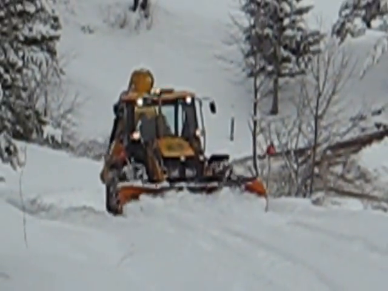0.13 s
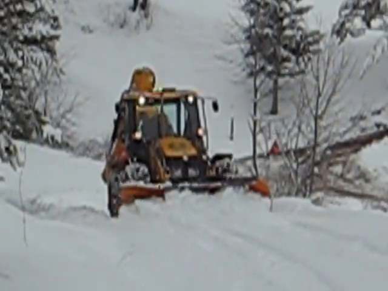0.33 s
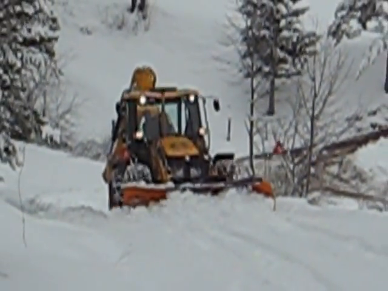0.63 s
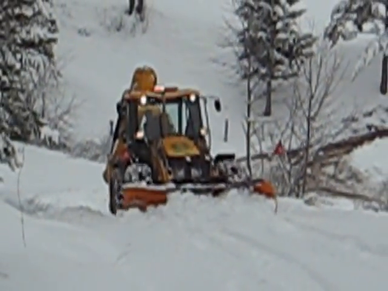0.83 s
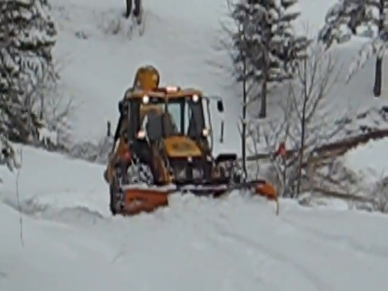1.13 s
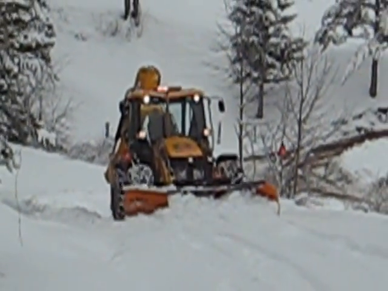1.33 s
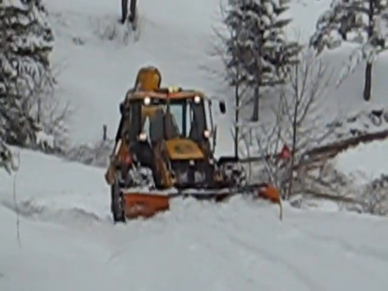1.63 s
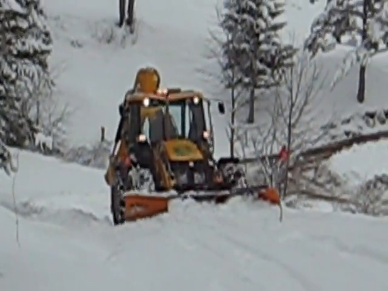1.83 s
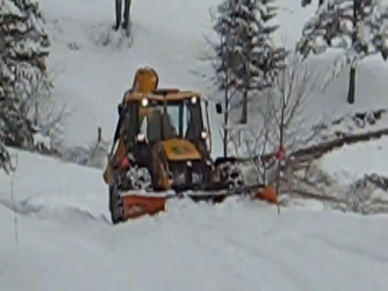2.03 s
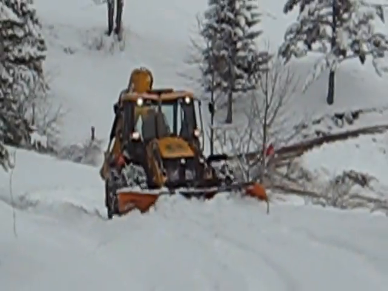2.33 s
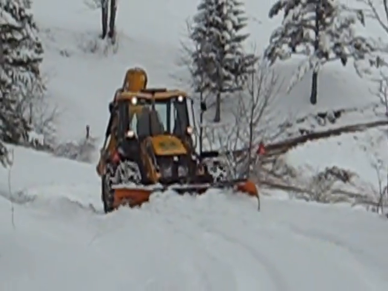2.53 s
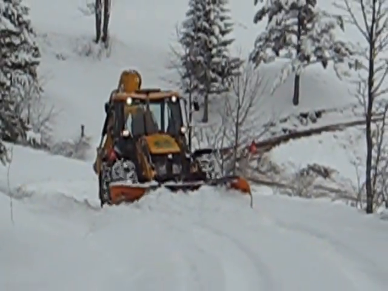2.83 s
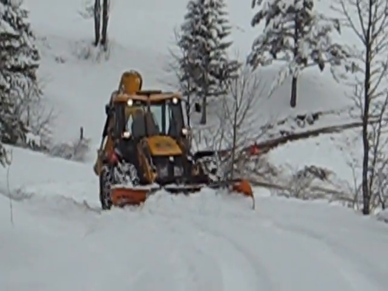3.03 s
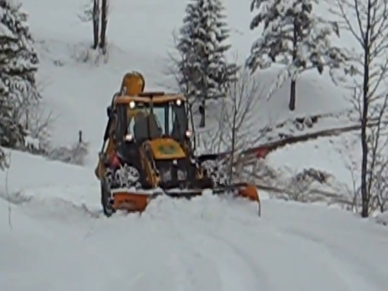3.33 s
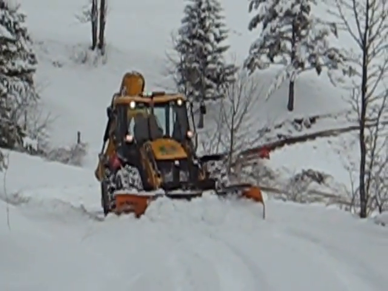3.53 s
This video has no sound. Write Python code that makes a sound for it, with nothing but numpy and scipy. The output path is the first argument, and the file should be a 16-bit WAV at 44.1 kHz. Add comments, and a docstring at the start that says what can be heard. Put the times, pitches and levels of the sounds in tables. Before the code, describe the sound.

A backhoe loader's diesel engine runs at high revs as it pushes snow toward the microphone outdoors. The exhaust drones over knocking clatter, fan rush and a faint whine, with a few brief dips in level.

```python
"""Four-cylinder diesel of a backhoe loader at high revs, pushing snow towards the listener. The exhaust drones
on the firing rate and barks once per cylinder; the block knocks, the fan rushes. A faint turbo whistle sinks
slowly. Bands of colour slide, mostly down, as the machine moves, and the level dips abruptly a few times."""
import sys
import numpy as np
from scipy import signal
from scipy.fft import rfft, irfft
from scipy.io import wavfile
from scipy.ndimage import map_coordinates

SR = 44100
rng = np.random.default_rng(int(sys.argv[2]) if len(sys.argv) > 2 else 0)


def wrap_up_sound(samples):
    """Save the sound to the file named by the first command line argument, as 16-bit audio."""
    columns = np.atleast_2d(samples).T
    # keep every value between -1 and 1, then stretch to whole-number steps
    tamed = np.clip(columns, -1, 1)
    steps = np.round(tamed * 32767).astype(np.int16)
    wavfile.write(sys.argv[1], SR, steps)


N = 162288
TIME_S = np.arange(N) / SR

# Engine speed: t/s, firing rate/Hz
FIRING_RATE = [(0.0, 73.56), (0.06, 73.18), (0.52, 72.92), (0.58, 73.87), (1.12, 73.94), (1.16, 74.42),
               (2.07, 74.32), (2.1, 74.64), (2.35, 74.84), (2.45, 74.7), (2.54, 72.78), (2.64, 72.78),
               (3.01, 74.6), (3.15, 74.42), (3.56, 75.22), (3.68, 74.5)]
# Cylinder strength in firing order: gain/dB
CYLINDER_GAINS_DB = [1.5, -1, 0.092, -1.1]
# Exhaust lines, changing as the machine turns: order/firing rate, start level/dB, end level/dB
EXHAUST_LINES = [(1, -45, -47), (2, -39, -37), (3, -33, -32.5), (4, -39, -40), (4.5, -42, -41),
                 (5, -28.5, -29.5), (5.25, -39.5, -38.5), (6, -31.5, -33.5), (7.5, -37.5, -32.5),
                 (7.75, -34, -33.5), (8, -41.5, -35.5), (8.5, -35, -40), (9, -42, -40.5),
                 (10, -33.5, -42.5), (10.5, -32.5, -44), (12.5, -37, -52.5), (13, -39, -54)]
# Layer mix: t/s, bark level/dB, clatter level/dB, low drone offset/dB
LAYER_LEVELS = [(0, -26.5, -28, -6), (.3, -22.5, -26, -3), (.6, -25.5, -26.5, -3), (1, -24.5, -26, -1.5),
                (1.5, -26, -25.5, -1.5), (2, -26, -25.5, 0.6), (2.3, -25.5, -25.5, -0.5),
                (2.6, -24, -26.5, -.5), (3.0, -23.5, -25.5, -0.5), (3.35, -24.5, -26, 2),
                (3.68, -24.5, -25, 0)]
# Exhaust pipe response: f/Hz, relative gain/dB
PIPE_RESPONSE = [(30, -27.5), (100, -25.5), (170, -14.5), (280, -8), (380, -2.5), (440, -1), (495, -4),
                 (570, 2.5), (690, -2.5), (770, -3.5), (850, -8), (950, -7), (1050, -16.5), (1500, -18.5),
                 (3000, -66.5)]
# Engine block response: f/Hz, relative gain/dB
BLOCK_RESPONSE = [(200, -19.5), (700, -4), (1050, 2), (1300, 3), (1800, 0.5), (2500, 1), (3500, -1.5),
                  (4500, -7), (5500, -11), (6200, -21.5), (6800, -41.5), (7200, -51)]
# Ground and blade echoes: lag/ms, lag growth/(ms/s), gain/dB
ECHOES = [(2.1, 0.18, -24.5), (3.4, 0.286, -18.5), (5.3, 0.255, -14.5)]
# Drifting peaks and hollows: mid t/s, half span/s, centre f/Hz, slide/(Hz/s), half width/Hz, gain/dB
COLOUR_BANDS = [(0.95, 1.35, 880, -5, 173, 5), (0.36, 0.87, 3020, -36, 130, 5),
                (1.5, 0.99, 2000, -220, 130, -7), (1.78, 0.7, 4040, -260, 170, 7),
                (2.5, 0.54, 3386, -400, 100, -7.5), (2.27, 0.91, 2830, -220, 250, 5),
                (2.979, 0.4, 1700, -150, 570, -3.5), (3.06, 1.2, 1318, 7.5, 90, 7.5),
                (3.39, 0.55, 2480, -400, 200, 4), (1.84, 1, 1009, 0.5, 74, -6.5),
                (.4, .6, 4400, -2.5, 100, -1.5), (0.75, 1.5, 3250, -350, 200, -3.5),
                (2, .3, 1540, 1.5, 70, -4), (1.7, 1.1, 2330, -150, 100, 4), (0.16, 0.4, 1250, 4, 190, -3),
                (0.43, 0.8, 1780, -100, 57, 6.5), (3.3, 0.5, 3940, -58.5, 110, 4.5),
                (2.6, .8, 4360, -330, 130, -6.5), (2.6, 1.4, 4950, -200, 190, 4),
                (2.3, 1.96, 4040, -200, 340, 7), (2.63, 1.85, 3902, -150, 217, -7),
                (.5, 1, 3800, 50, 85, -4.5), (1.1, .6, 3570, 0, 72, 3.5), (2.6, .65, 5540, 50, 140, -5),
                (1.8, 0.65, 2640, -200, 100, -3.5), (3.2, .55, 3060, -280, 78, -4.5)]
# Dips of the whole sound: t/s, depth/dB, recovery/s
LEVEL_DIPS = [(1.519, 2, 0.062), (2.021, 2, 0.14), (2.238, 1.5, 0.096), (2.64, 9, 0.29), (3.399, 2, 0.1),
              (3.559, 3.5, 0.28)]

CYLINDERS = len(CYLINDER_GAINS_DB)
FLUTTER_HZ, SPEED_JITTER = 45, 0.00299
BARK_FLUTTER_DB, CLATTER_FLUTTER_DB, LOPE_DB = 1.4, 0.3, 1.1
WAVER_HZ, WAVER_DB_PER_ORDER, WAVER_TURNS_PER_ORDER = 30, 0.7, 0.007
DRONE_CORNER_HZ, STEADY_ORDER, WAVER_TOP_ORDER = 402, 2, 8


def undb(db):
    """Decibels to gain."""
    return 10 ** (np.asarray(db) / 20)


def unit(x):
    """Scale to rms 1."""
    return x / np.sqrt(np.mean(x ** 2))


def curve(table, column=1):
    """One column of a time table, per sample."""
    rows = np.array(table)
    return np.interp(TIME_S, rows[:, 0], rows[:, column])


def wander(rate_hz):
    """Smooth random drift, rms 1."""
    steps = rng.standard_normal(1024)
    return unit(map_coordinates(steps, [TIME_S * rate_hz], order=3, mode="mirror"))


def colour(x, response):
    """Filter by a response table; output rms 1."""
    f_hz, gain_db = np.array(response).T
    bins_hz = np.maximum(np.arange(N // 2 + 1) * SR / N, 1)
    bins_db = np.interp(np.log(bins_hz), np.log(f_hz), gain_db)
    return unit(irfft(rfft(x) * undb(bins_db), N))


def dip_gain(fall_s=0.0022, hold_s=0.035):
    """The level drops abruptly, holds, climbs back."""
    loss_db = sum(np.interp(TIME_S, at_s + np.cumsum([0, fall_s, hold_s, recovery_s]), [0, db, db, 0])
                  for at_s, db, recovery_s in LEVEL_DIPS)
    return undb(-loss_db)


def sliding_colour(x):
    """Spectral peaks and hollows swell, drift and fade as the machine moves."""
    f_hz, t_s, spectrum = signal.stft(x, SR, nperseg=1024)
    gain_db = 0
    for mid_s, span_s, centre_hz, slide_hz_per_s, width_hz, band_db in COLOUR_BANDS:
        offset_s = t_s - mid_s
        offset_hz = f_hz[:, None] - centre_hz - slide_hz_per_s * offset_s
        gain_db += band_db * np.exp(-(offset_s / span_s) ** 2 - (offset_hz / width_hz) ** 2)
    return signal.istft(spectrum * undb(gain_db), SR)[1][:N]


def reflections(x):
    """Ground and blade echoes comb the sound, lags growing with the motion; output rms 1."""
    echoes = sum(undb(db) * np.interp(TIME_S - (lag_ms + growth_ms_per_s * TIME_S) / 1000, TIME_S, x)
                 for lag_ms, growth_ms_per_s, db in ECHOES)
    return unit(x + echoes)


def whine(start_hz=2927, slide_hz_per_s=-35, width_hz=110, level_db=-41.5):
    """Narrow, rough, sinking noise band, the turbo whistle."""
    phase_rad = 2 * np.pi * np.cumsum(start_hz + slide_hz_per_s * TIME_S) / SR
    band = wander(width_hz) * np.sin(phase_rad) + wander(width_hz) * np.cos(phase_rad)
    return undb(level_db) * band


def combustion_bursts(firings, decay_firings, floor, repeat_share, rise_firings=0.045):
    """One noise burst per firing over a steady floor; part of the texture repeats each engine cycle."""
    age_firings = firings % 1
    envelope = unit((1 - np.exp(-age_firings / rise_firings)) * np.exp(-age_firings / decay_firings))
    strength = undb(CYLINDER_GAINS_DB)[np.floor(firings).astype(int) % CYLINDERS]
    cycle_points = 2048
    texture = irfft(np.exp(2j * np.pi * rng.random(cycle_points // 2 + 1)))
    position = firings / CYLINDERS % 1 * cycle_points
    repeating = unit(map_coordinates(texture, [position], order=3, mode="grid-wrap"))
    noise = np.sqrt(repeat_share) * repeating + np.sqrt(1 - repeat_share) * rng.standard_normal(N)
    return unit((envelope * strength + floor) * noise)


def clatter_and_fan(firings, lag_firings=0.5, fan_re_knock_db=-2):
    """Combustion knocks the block between exhaust barks, over the even rush of the fan."""
    knock = combustion_bursts(firings - lag_firings, decay_firings=0.45, floor=1.05, repeat_share=0.25)
    fan = undb(fan_re_knock_db) * rng.standard_normal(N)
    level_db = curve(LAYER_LEVELS, column=2) + CLATTER_FLUTTER_DB * wander(FLUTTER_HZ)
    return reflections(colour(knock + fan, BLOCK_RESPONSE)) * undb(level_db)


def exhaust_bark(firings, throb_db):
    """Gas bursts ring the pipe."""
    gas = combustion_bursts(firings, decay_firings=0.37, floor=0.81, repeat_share=0.08)
    return colour(gas, PIPE_RESPONSE) * undb(curve(LAYER_LEVELS, column=1) + throb_db)


def exhaust_drone(firings, throb_db):
    """Crank-locked lines: high ones waver and throb with the bark, low ones throb against it."""
    offset_db = curve(LAYER_LEVELS, column=3)
    start_rate_hz = FIRING_RATE[0][1]
    drone = 0
    for order, start_db, end_db in EXHAUST_LINES:
        low_weight = 1 / (1 + (order * start_rate_hz / DRONE_CORNER_HZ) ** 2)
        level_db = np.linspace(start_db, end_db, N) + low_weight * offset_db
        level_db += (0.5 - low_weight) * throb_db
        waver_orders = np.clip(order, STEADY_ORDER, WAVER_TOP_ORDER) - STEADY_ORDER
        waver_gain = unit(undb(WAVER_DB_PER_ORDER * waver_orders * wander(WAVER_HZ)))
        waver_turns = WAVER_TURNS_PER_ORDER * waver_orders * wander(WAVER_HZ)
        phase_turns = order * firings + waver_turns + rng.random()
        drone += waver_gain * undb(level_db) * np.sin(2 * np.pi * phase_turns)
    return np.sqrt(2) * drone


def scene():
    """One crankshaft drives drone, bark and clatter; uneven combustion makes the exhaust throb."""
    firing_hz = curve(FIRING_RATE) * (1 + SPEED_JITTER * wander(FLUTTER_HZ))
    firings = np.cumsum(firing_hz) / SR
    lope_db = LOPE_DB * np.cos(2 * np.pi * firings / CYLINDERS)
    throb_db = BARK_FLUTTER_DB * wander(FLUTTER_HZ) + lope_db
    exhaust = exhaust_drone(firings, throb_db) + exhaust_bark(firings, throb_db)
    engine = sliding_colour(exhaust + clatter_and_fan(firings))
    return ((engine + whine()) * dip_gain())[None]


def record(dry):
    """Soft peak limit, then a steep treble cut."""
    peak_limit, cutoff_hz = 0.6, 7100
    rounded = peak_limit * np.tanh(dry / peak_limit)
    lowpass = signal.ellip(10, 0.2, 80, cutoff_hz, fs=SR, output="sos")
    return signal.sosfilt(lowpass, rounded)


dry = scene()
out = record(dry)
wrap_up_sound(out)
```